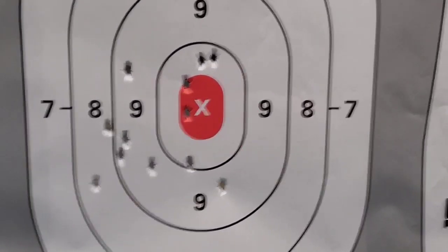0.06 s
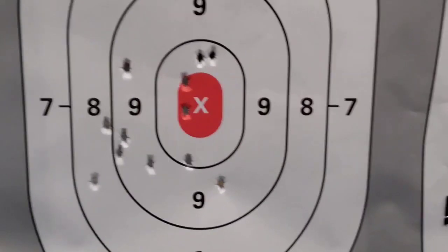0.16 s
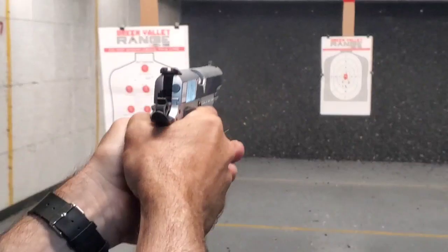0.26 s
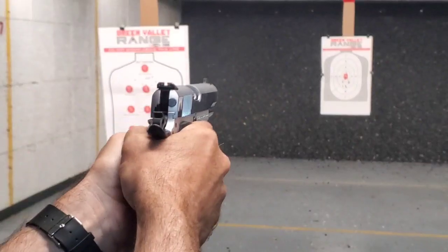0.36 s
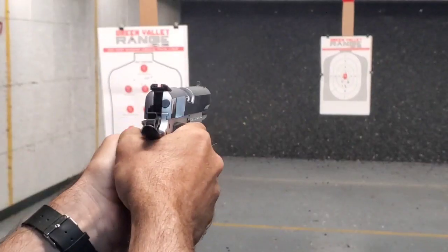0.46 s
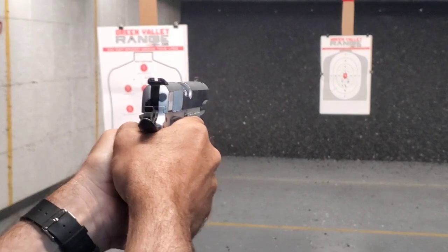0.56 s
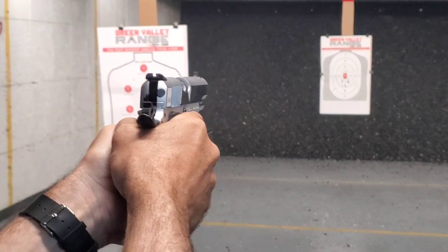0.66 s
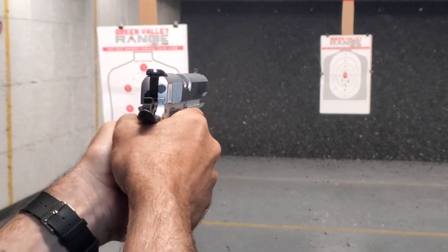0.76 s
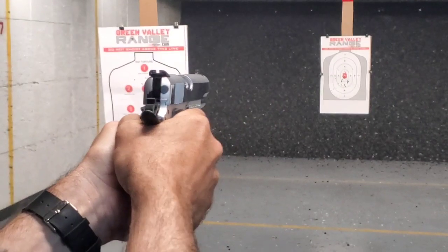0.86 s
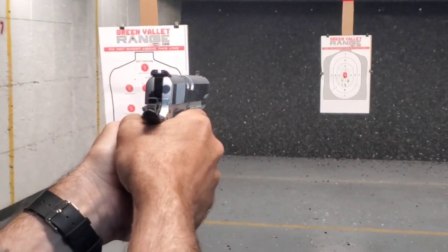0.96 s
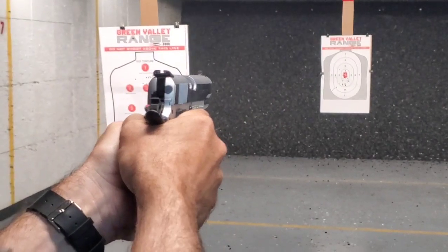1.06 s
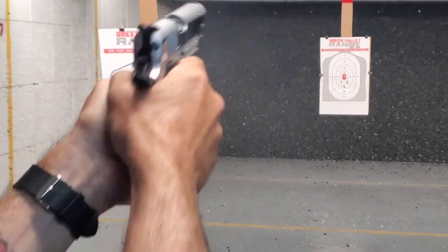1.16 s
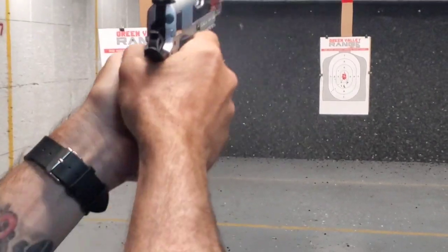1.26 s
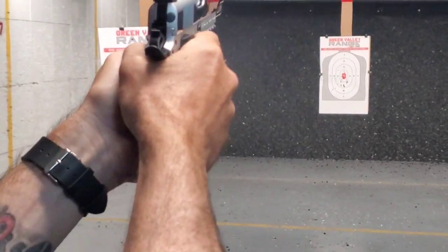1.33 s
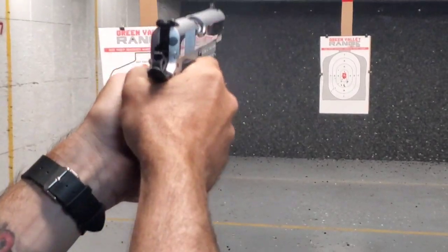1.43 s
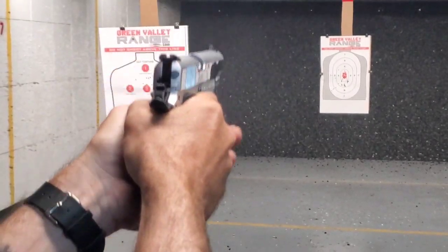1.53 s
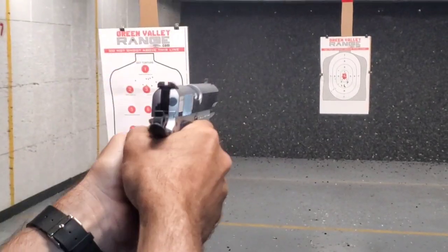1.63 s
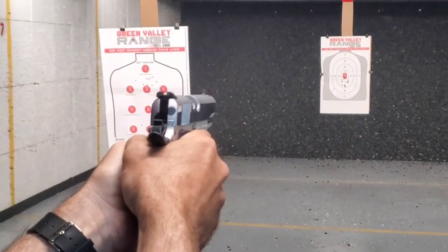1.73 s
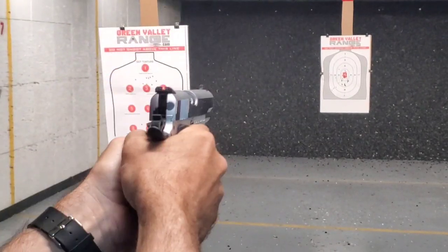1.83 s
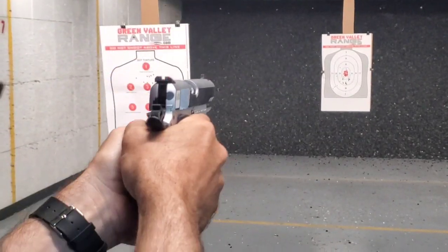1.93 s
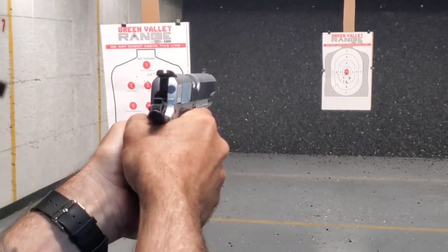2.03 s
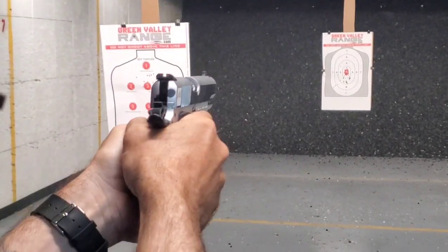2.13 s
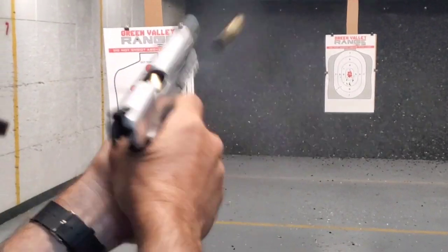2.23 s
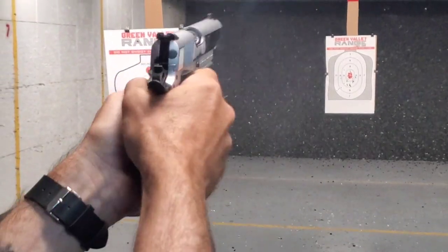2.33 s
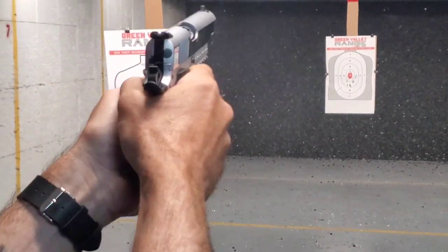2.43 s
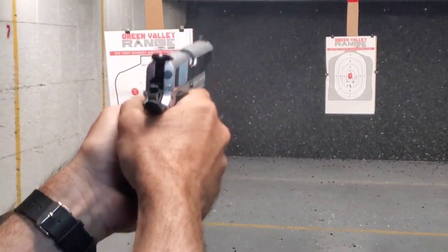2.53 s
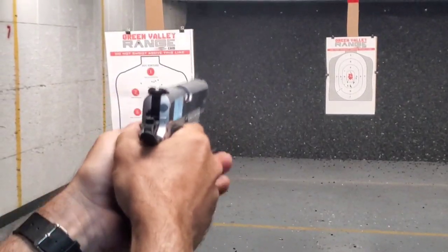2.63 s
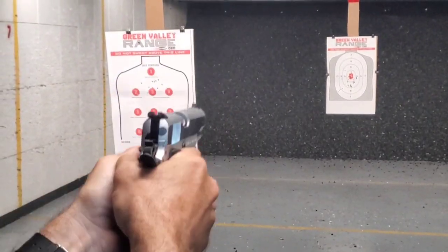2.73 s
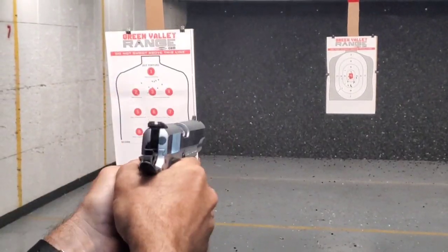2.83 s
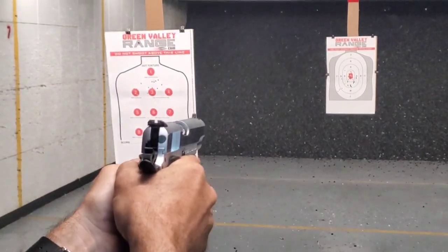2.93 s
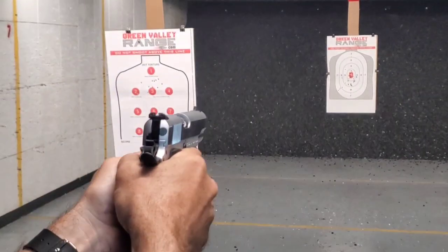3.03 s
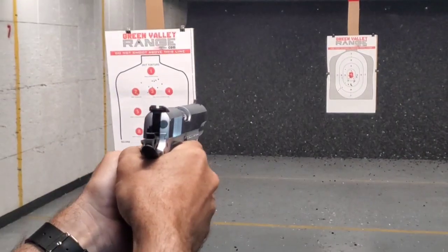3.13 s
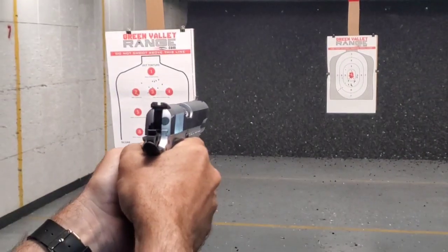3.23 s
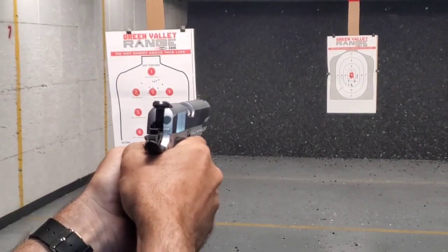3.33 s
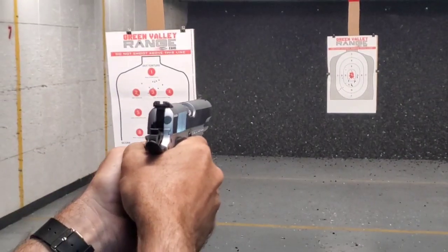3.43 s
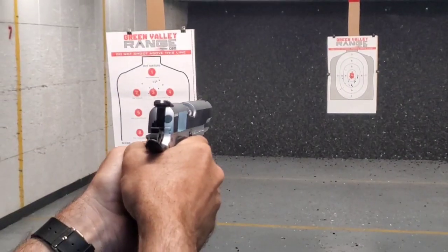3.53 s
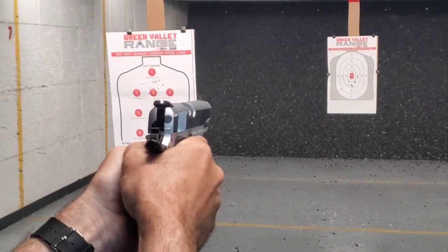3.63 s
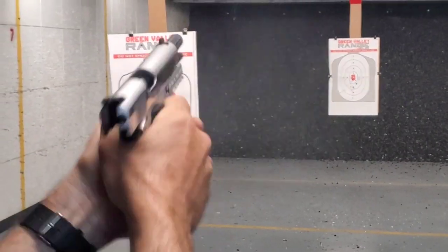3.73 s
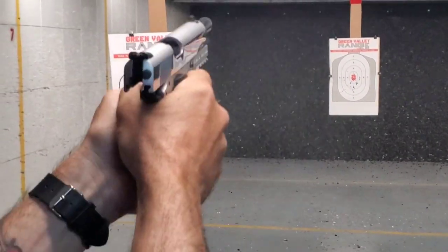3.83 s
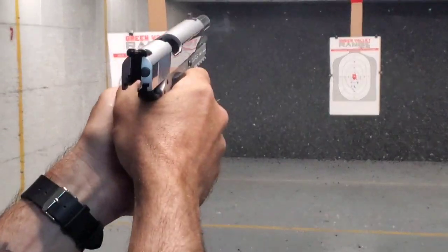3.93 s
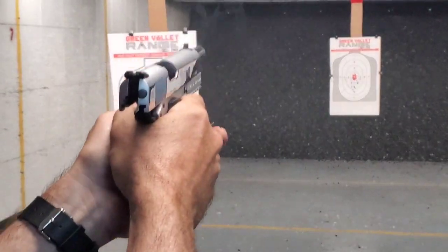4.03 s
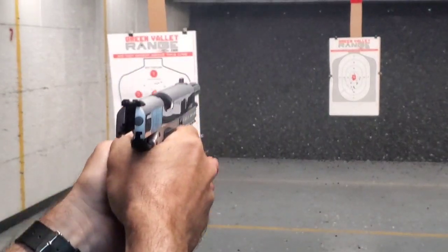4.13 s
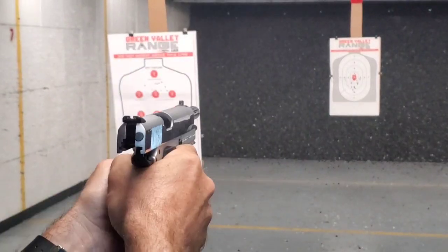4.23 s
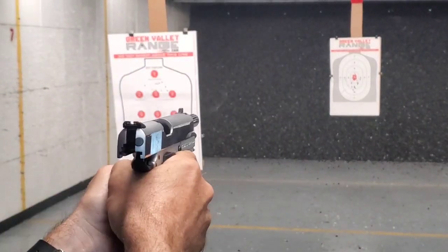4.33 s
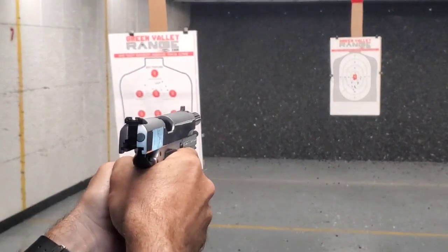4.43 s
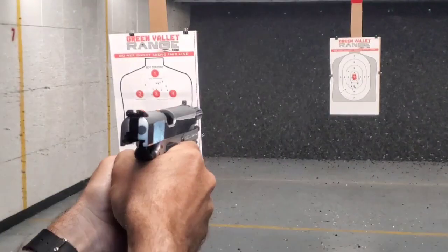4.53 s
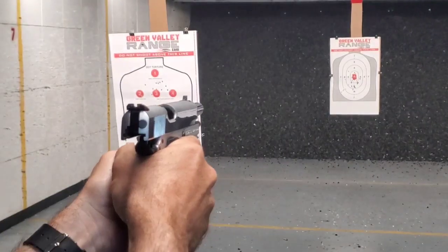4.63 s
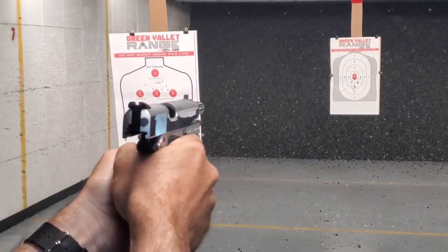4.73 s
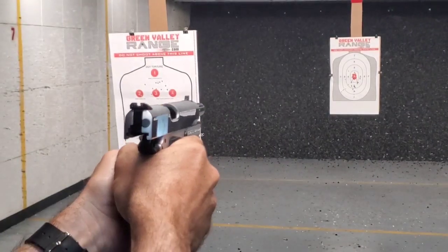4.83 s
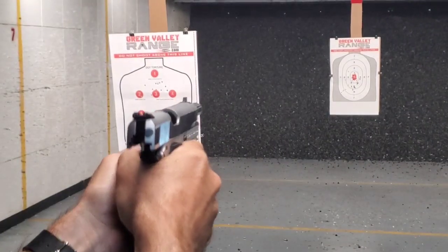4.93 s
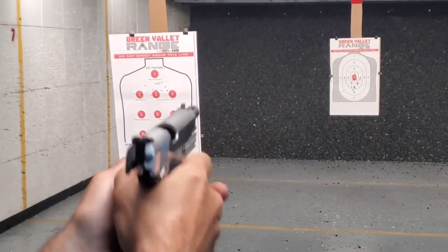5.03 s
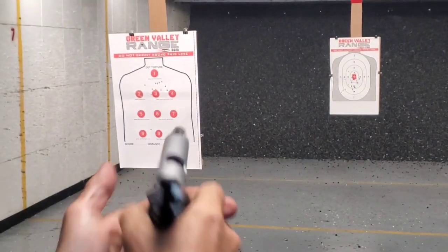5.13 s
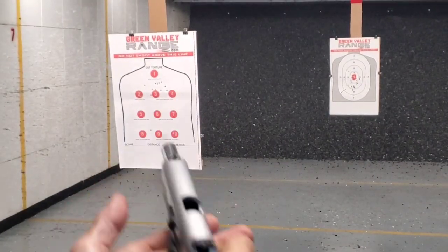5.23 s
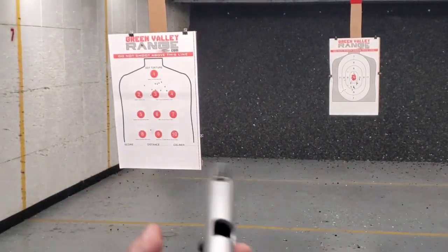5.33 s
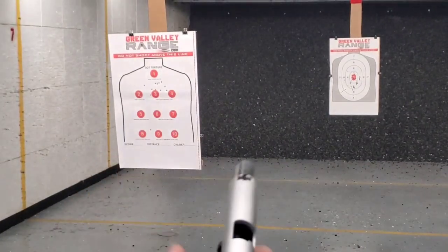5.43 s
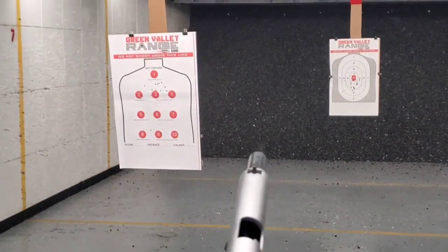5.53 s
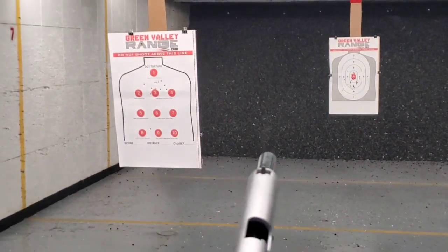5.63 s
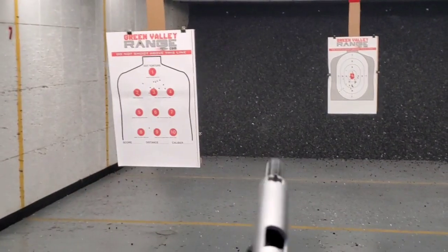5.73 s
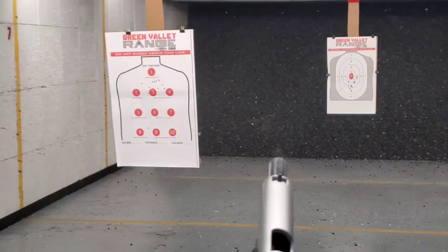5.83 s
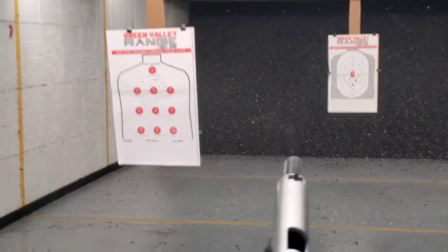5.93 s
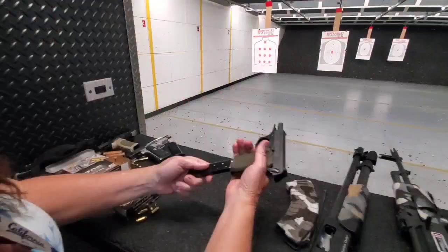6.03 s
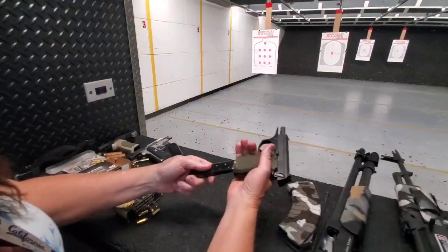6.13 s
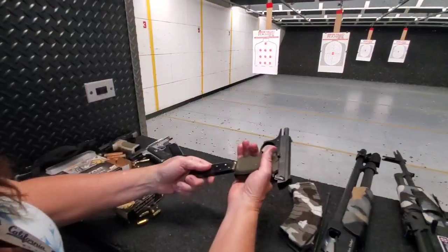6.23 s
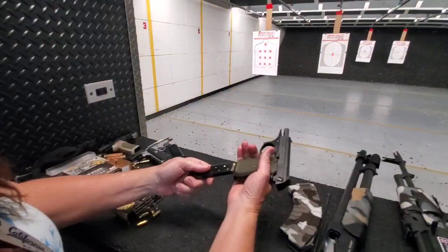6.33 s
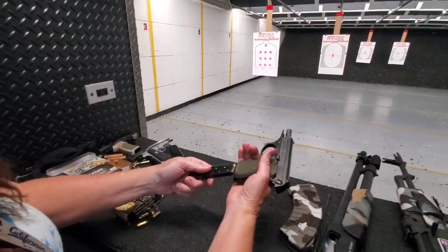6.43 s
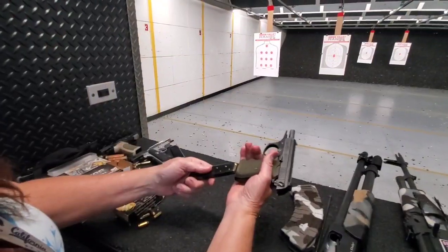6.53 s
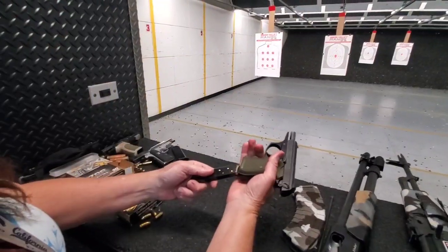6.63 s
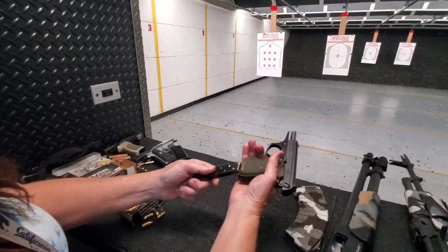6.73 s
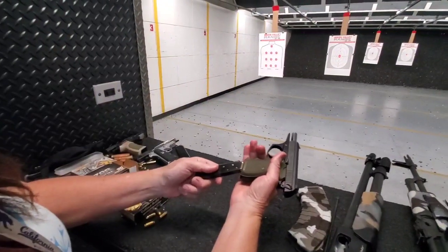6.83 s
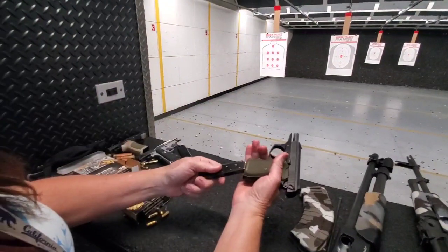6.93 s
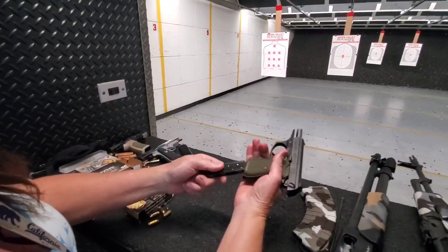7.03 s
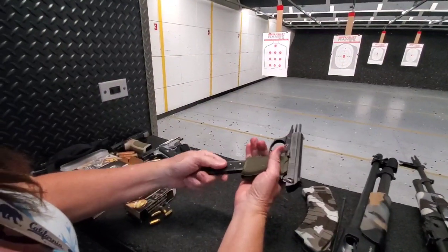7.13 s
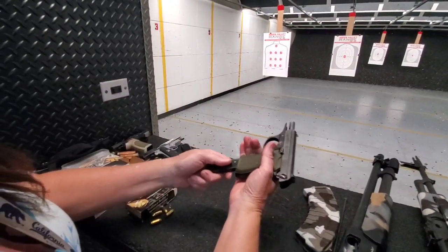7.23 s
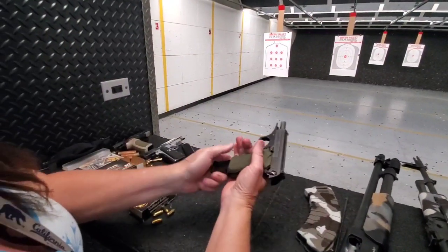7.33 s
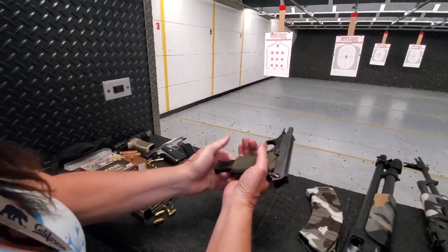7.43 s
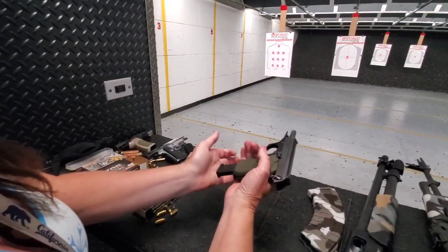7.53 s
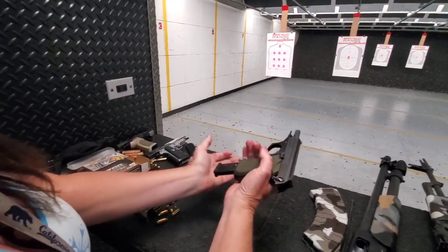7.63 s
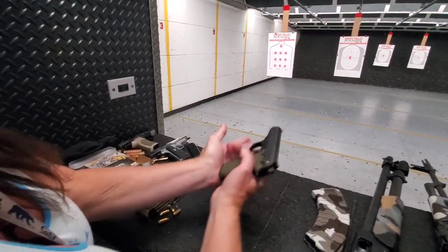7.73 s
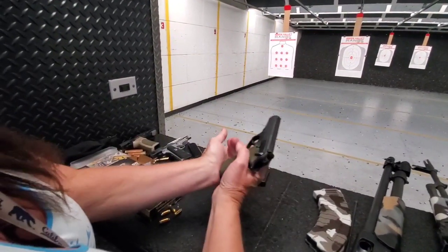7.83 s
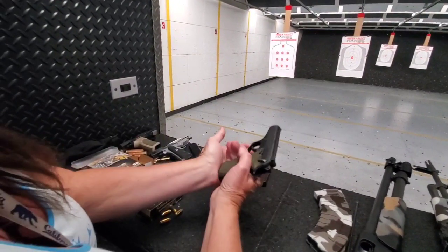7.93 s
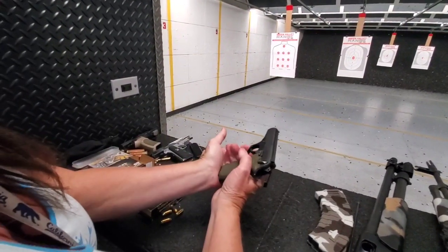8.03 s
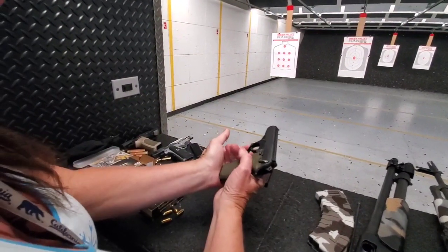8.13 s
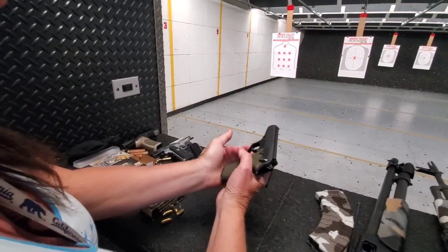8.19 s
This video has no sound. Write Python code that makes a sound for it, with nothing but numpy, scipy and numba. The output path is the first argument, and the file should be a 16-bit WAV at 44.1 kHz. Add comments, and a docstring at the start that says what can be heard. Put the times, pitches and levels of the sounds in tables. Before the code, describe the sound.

A low beating hum and faint air fade for 0.24 s, then a brief silence. At 0.34 s a somewhat duller pistol shot bursts out, followed by a brighter one at 1.24, a close pair at 2.17 and 2.36, and another pair at 3.82 and 4.1. Each is a hard crack with dense concrete echo and a low boom lasting over a second, loud enough to be limited. Between them brass cases click and ring high, strongest near 2.68, 3.05 and 4.48, some to the left. From about 5.6 ventilation rush, rumble and whine swell, cutting at 6.09 for an instant. A leftover boom and quiet air follow, with light handling scrapes at 6.27 and 6.5. Shots hit at 6.73 and 7.0. Scrapes at 7.66 lead to a rapid cluster of sharp magazine snaps around 7.9, then the echo and fan noise fade.

```python
"""Pistol shots in two lanes of a concrete indoor range: each is a shock pulse, an echo of decaying noise
and the hall's booming low air modes, all driving a limiter. Brass cases bounce as noise clicks with
short and ringing modes; hands, gear and a magazine scrape and snap as shaped noise. Ventilation is
filtered noise with fan tones and a whine, and it swells before the second of two brief silent gaps."""
import sys
import numpy as np
from scipy import signal
from scipy.fft import rfft, irfft, next_fast_len
from scipy.io import wavfile
from scipy.ndimage import uniform_filter1d, map_coordinates
from numba import njit

SR = 44100
rng = np.random.default_rng(int(sys.argv[2]) if len(sys.argv) > 2 else 0)


def to_wav(sig):
    """Store sig (one row per channel, or 1-D mono) as 16-bit WAV at the path in sys.argv[1].

    Samples outside -1..1 are clipped; the rate is SR.
    """
    pcm = np.clip(np.atleast_2d(sig), -1, 1) * 32767
    pcm = np.round(pcm).astype(np.int16)
    wavfile.write(sys.argv[1], SR, pcm.T)  # frames by channels


N = 364266

# pistol shots: start_s, blast_db, boom_db, treble_db
SHOTS = [(0.3351, 10.5, -24, -9), (1.235, 12.5, -20.5, 1.5), (2.1672, 14.5, -25.5, -3),
         (2.358, 12.5, -20.5, 2), (3.8176, 12.9, -20.5, 0.5), (4.095, 15, -26.5, -2.5),
         (6.734, 13, -26.5, -1.5), (6.995, 12, -27, -3.5)]
# silent gaps: start_s, end_s
GAPS = [(0.238, .33), (6.085, 6.099)]


def amp(db):
    """Amplitude factor of a level in dB."""
    return 10 ** (np.asarray(db) / 20)


def unit(x):
    """Scale to an RMS of 1."""
    return x / np.sqrt(np.mean(x ** 2) + 1e-20)


def along(points, hz):
    """Interpolate (Hz, value) points on a log frequency axis."""
    f, v = np.transpose(points)
    return np.interp(np.log(hz + 1), np.log(f + 1), v)


def add(track, sound, start_s):
    """Mix in a stereo sound, cut off at the end of the next gap."""
    i = round(start_s * SR)
    cuts = [round(end_s * SR) - i for _, end_s in GAPS if end_s > start_s]
    n = min([sound.shape[1], N - i] + cuts)
    track[:, i:i + n] += sound[:, :n]


def sides(pan_db):
    """Left and right gains whose ratio is pan_db; positive leans left."""
    return amp([[pan_db / 2], [-pan_db / 2]])


def field(size, spectrum_db, t60_s=None, patchy_db=0):
    """Stereo noise of a given spectrum, each frequency dying at its own speed, in patches of uneven strength."""
    # left-right correlation: freq_hz, correlation
    likeness = [(60, 1), (200, .8), (500, 0.61), (1000, 0.16), (3000, 0.0038), (15000, 0.073)]
    hz, t, z = signal.stft(rng.standard_normal((2, size)), SR, nperseg=512)
    turn = np.arccos(np.clip(along(likeness, hz), -1, 1))[:, None] / 2
    mid, side = np.cos(turn) * z[0], np.sin(turn) * z[1]
    z = np.array([mid + side, mid - side])
    patches = rng.standard_normal(z.shape[1:])
    patches = uniform_filter1d(patches, size=6, axis=0)
    patches = uniform_filter1d(patches, size=5, axis=1)
    gain = amp(spectrum_db(hz)[:, None] + patchy_db * unit(patches))
    if t60_s:
        gain = gain * amp(-60 * t / t60_s(hz)[:, None])
    return signal.istft(z * gain, SR, nperseg=512)[1][:, :size]


def ventilation():
    """Air rush over unsteady fan tones and a rumble, with a whine; all swell once, and shots shake the rumble."""
    # air rush spectrum: freq_hz, density_db_per_hz
    rush_spectrum = [(15, -39.5), (25, -20), (41, -11.5), (97, -3.5), (117, -17), (157, 0.5), (180, -18),
                     (317, -9), (1230, -27), (3820, -37), (4490, -41), (7710, -43.5), (16000, -56.5)]
    # fan tones: freq_hz, level_db against the rush
    fan_tones = [(151, -14.5), (231, -8.5), (318, -14), (441, -13), (528, -15)]
    # rumble spectrum: freq_hz, density_db_per_hz
    rumble_spectrum = [(10, -29), (25, 1), (45, 1.5), (70, -24.5), (200, -88.5)]
    air_db, whine_db, rumble_db = -58, -76.5, -66  # steady levels
    air_swell_db, whine_swell_db, rumble_swell_db = 22, 35.5, 19  # swell peaks against steady
    swell_end_s, swell_rise_s = 6.09, .44
    shake_db, shake_rise_s, shake_t60_s = -50, .12, 1.5
    whine_hz = 663
    t = np.arange(N) / SR

    def swell(peak_db):
        return 1 + amp(peak_db * (1 - abs(swell_end_s - t) / swell_rise_s)) * (t < swell_end_s)

    def waver():
        return map_coordinates(rng.standard_normal(200), [t * 14])  # 14 random points per second

    rush = unit(field(N, lambda hz: along(rush_spectrum, hz)))
    hum = 0
    for hz, db in fan_tones:
        hum = hum + amp(db + 4.3 * waver()) * np.sin(2 * np.pi * hz * t + 0.5 * waver())
    air = amp(air_db) * swell(air_swell_db) * (rush + hum)

    whine = np.sin(2 * np.pi * whine_hz * t + .6 * waver())
    whine = amp(whine_db) * swell(whine_swell_db) * whine

    noise = signal.resample(rng.standard_normal((2, N // 50)), N, axis=1)  # low frequencies only
    deep = irfft(rfft(noise) * amp(along(rumble_spectrum, np.fft.rfftfreq(N, 1 / SR))), N)
    shake = 0
    for start_s, *_ in SHOTS:
        since_s = np.maximum(t - start_s, 0)
        shake = shake + amp(shake_db - 60 * since_s / shake_t60_s) * (1 - np.exp(-since_s / shake_rise_s))
    rumble_level = amp(rumble_db) * swell(rumble_swell_db) + shake
    rumble = rumble_level * unit(deep + deep[::-1] * 0.4)  # each side leaks into the other
    return air + whine + rumble


def opening_tones():
    """Two low tones beat and decay until the first gap ends."""
    # tones: freq_hz, level_db, t60_s
    low_tones = [(73.6, -37, 1.9), (98, -35, 1.4)]
    out, t = np.zeros((2, N)), np.arange(2 * SR) / SR
    tones = sum(amp(db - 60 * t / t60_s) * np.sin(2 * np.pi * hz * t) for hz, db, t60_s in low_tones)
    add(out, tones[None], 0)
    return out


def tilt(hz, bass_db, treble_db):
    """The contact spectrum with a low and a high shelf."""
    # contact spectrum: freq_hz, density_db_per_hz
    contact_spectrum = [(300, -7.5), (1000, -3.5), (3500, 4.5), (5500, 2), (8500, -4), (13000, 4.5),
                        (16000, 1.5)]
    bass = bass_db / (1 + (hz / 3200) ** 4)
    treble = treble_db / (1 + (9500 / (hz + 1)) ** 6)
    return along(contact_spectrum, hz) + bass + treble


def click(colour, scrape_s, near_t60_s, far_db, far_t60_s, wall_db, wall_s=0.19):
    """A contact: a snap and a burst dying in the booth, a fainter answer of the hall and the far wall's slap."""
    snap_db, snap_t60_s = 4.5, 0.008
    t = np.arange(SR // 2) / SR
    since_s = np.maximum(t - scrape_s, 0)
    near = amp(-60 * since_s / near_t60_s)
    far = amp(far_db - 60 * since_s / far_t60_s)
    snap = amp(snap_db - 60 * t / snap_t60_s)
    back_s = np.maximum(t - wall_s, 0)
    slap = amp(wall_db - 60 * back_s / far_t60_s) * (1 - np.exp(-back_s / .015))
    shape = near + far + snap + slap
    return field(len(t), colour, patchy_db=1.5) * shape * (1 - np.exp(-t / 0.0014))


def handling():
    """Hands, gear and magazine scrape and snap, each with its own resonance; more bass means less treble."""
    # contacts: start_s, level_db, left_right_db, bass_db, scrape_s, t60_s, body_hz
    contacts = [(0.079, -75, 1, 23, 0.049, 0.5, 3000), (3.642, -67, -1, 28, 0.018, 0.12, 790),
                (3.712, -55.5, 0, 4.5, 0.11, .1, 2000), (6.0337, -46, -9.5, 11.5, 0.0018, 0.02, 2470),
                (6.105, -69, 1.5, 10.5, 0.043, 0.23, 3000), (6.269, -55, 1, 11.5, 0.044, 0.39, 850),
                (6.49, -53, 4, 3, 0.0041, 0.06, 1500), (7.657, -52, 3, -5, 0.042, 0.27, 4000),
                (7.777, -52, 1, 0.5, 0.052, 0.2, 3110), (7.87, -34.5, 2, -4.5, 0.0047, 0.134, 2970),
                (7.888, -20.5, 3.5, -9, 0.0033, 0.058, 3000), (7.903, -26.5, 16.5, -8.5, .003, 0.043, 3000),
                (7.911, -11.5, 1.5, -7, 0.0052, 0.039, 2050), (7.927, -37.5, 1.5, -7.5, 0.0073, 0.41, 2050)]
    base_treble_db, treble_per_bass, body_db = -5.5, -0.39, 8.5
    out = np.zeros((2, N))
    for start_s, db, pan_db, bass_db, scrape_s, t60_s, body_hz in contacts:
        treble_db = base_treble_db + treble_per_bass * bass_db

        def colour(hz):
            body = body_db / (1 + ((hz - body_hz) / (0.091 * body_hz)) ** 2)
            return tilt(hz, bass_db, treble_db) + body

        sound = click(colour, scrape_s, t60_s, far_db=-19, far_t60_s=0.2, wall_db=-39.0)
        add(out, amp(db) * sides(pan_db) * sound, start_s)
    return out


def boom(t, rise_s=0.078, apart_s=0.00013):
    """The hall's air modes build up as the wave crosses it, then ring out, slightly offset between channels."""
    # low air modes of the hall: freq_hz, level_db, t60_s
    air_modes = [(55.5, -11.5, 2.4), (79.1, -19, 2.6), (91.18, 2.5, 2.18), (98.4, -22.5, 3.7),
                 (120.4, -0.5, 1), (168, -16.5, 0.43), (211.3, -8.5, 1.2), (257, -13, 0.41), (326, -5, .4),
                 (476, -8, 0.97), (501, -10, 0.85), (578, -7.5, 0.45), (690, -6.5, 0.45), (820, -4.5, 0.36)]
    ports_s = t + np.array([[-apart_s], [apart_s]])
    ring = sum(amp(db - 60 * t / t60_s) * np.sin(2 * np.pi * hz * ports_s) for hz, db, t60_s in air_modes)
    return ring * (1 - np.exp(-(t / rise_s) ** 2))


def shots():
    """A shock pulse, the hall's dense echo in a quick and a slow part, and the boom; one boom tail stands alone."""
    # quick echo spectrum: freq_hz, density_db_per_hz
    blast_spectrum = [(35, -43), (60, -13), (217, -9), (287, -10.5), (398, -4.5), (842, -3), (1820, -11),
                      (2650, -13), (6740, -18), (7400, -22.5), (13000, -17), (14900, -16.5), (16000, -29.5)]
    # quick echo decay: freq_hz, t60_s
    hall_decay = [(40, 0.45), (120, 0.71), (300, 0.56), (700, 0.52), (2000, 0.63), (5000, 0.42),
                  (9000, 0.32), (15000, 0.27)]
    # slow echo: freq_hz, density_db_per_hz, t60_s
    slow_echo = [(150, -45, 0.88), (600, -41, 1.8), (2480, -35.5, 1.11), (6000, -43.5, .8),
                 (15000, -51.5, 0.27)]
    # boom tails without a blast: start_s, shot_age_s, boom_db
    boom_tails = [(6.099, 1.1, -14)]
    bass_per_treble = .55  # nearer shots are both brighter and fuller
    out, t = np.zeros((2, N)), np.arange(2 * SR) / SR
    u = t[:SR // 20] / 0.00016
    shock = 0.077 * (1 - u) * np.exp(-u)
    late_hz, late_db, late_t60_s = np.transpose(slow_echo)
    late_spectrum = np.column_stack((late_hz, late_db))
    late_decay = np.column_stack((late_hz, late_t60_s))
    for start_s, db, boom_db, treble_db in SHOTS:
        bass_db = bass_per_treble * treble_db

        def colour(hz):
            treble = treble_db / (1 + (6000 / (hz + 1)) ** 2)
            bass = bass_db / (1 + (hz / 260) ** 4)
            return along(blast_spectrum, hz) + treble + bass

        quick = field(len(t), colour, lambda hz: along(hall_decay, hz), patchy_db=1.5)
        slow = field(len(t), lambda hz: along(late_spectrum, hz),
                     lambda hz: along(late_decay, hz), patchy_db=2.5)
        blast = (quick + slow) * (1 - np.exp(-t / 0.0045))
        blast[:, :len(u)] += shock
        add(out, amp(db) * blast + amp(boom_db) * boom(t), start_s)
    for start_s, age_s, boom_db in boom_tails:
        add(out, amp(boom_db) * boom(t[:SR] + age_s), start_s)
    return out


def bounce(click_db, bass_db, treble_db, click_t60_s, modes):
    """A click on the concrete with short contact modes, and the brass tube's ring, wavering as it spins."""
    # short modes during floor contact: freq_hz, level_db against the click, t60_s
    contact_modes = [(2100, -2, .03), (3600, -9, .03), (5600, -3, .035), (13200, -5, .03)]
    settle_s = .15  # the wavering shrinks as the spin slows
    t = np.arange(SR // 2) / SR
    sound = amp(click_db) * click(lambda hz: tilt(hz, bass_db, treble_db), 0, click_t60_s,
                                  far_db=-12.5, far_t60_s=0.34, wall_db=-42.5)
    for hz, db, t60_s in contact_modes:
        level_chance, pitch_chance = rng.standard_normal(2)
        level_db = click_db + db + tilt(hz, bass_db, treble_db) + 2.5 * level_chance
        tone = np.sin(2 * np.pi * hz * (1 + .04 * pitch_chance) * t)
        sound = sound + amp(level_db - 60 * t / t60_s) * tone * (1 - np.exp(-t / .0011))
    for hz, db, t60_s, waver in modes:
        # two smooth random curves, 200 points per second
        where = [[[0], [1]] + 0 * t, 200 * t + [[0], [0]]]
        spin = map_coordinates(rng.standard_normal((2, 120)), where)
        spin = spin * (.3 + 0.81 * np.exp(-t / settle_s))
        # each channel's phase follows the other's level curve
        ring = amp(db - 60 * t / t60_s + 2.5 * spin) * np.sin(2 * np.pi * hz * t + waver * spin[::-1])
        sound = sound + np.sqrt(2) * ring * (1 - np.exp(-t / 0.0053))
    return sound


def far_cases():
    """Cases from the next lane, on the left, bounce and ring in one mode."""
    # bounces: start_s, click_db, left_right_db, treble_db, ring_hz, ring_db
    far_bounces = [(0.539, -36, 5.5, 0, 10700, -53), (1.088, -56, 13.5, 13, 11240, -43.5),
                   (1.831, -57, 5, 9, 11280, -46.5), (2.0186, -68, 14.5, 6, 11400, -61.5),
                   (2.144, -56, 6, -13, 11280, -59), (2.8, -75, 7, -5, 11280, -68),
                   (3.1394, -51, 6.5, -8, 11280, -53), (3.56, -74.5, 6, -5, 11280, -66),
                   (4.479, -31.5, 2, -2.5, 11520, -49), (4.8898, -52.5, 12.5, 17, 11550, -43.5),
                   (5.5163, -54, 9, 6, 11550, -44.5), (5.903, -46.5, 3, -4, 11540, -37),
                   (5.9216, -51, 8, 9, 11550, -31.5)]
    bass_db, click_t60_s, ring_t60_s, waver = -10, 0.092, 0.29, 1.5
    out = np.zeros((2, N))
    for start_s, db, pan_db, treble_db, hz, ring_db in far_bounces:
        modes = [(hz, ring_db, ring_t60_s, waver)]
        add(out, sides(pan_db) * bounce(db, bass_db, treble_db, click_t60_s, modes), start_s)
    return out


def near_cases():
    """The shooter's cases bounce and ring in three modes, leaning to high or low modes by bounce."""
    # bounces: start_s, click_db, bass_db, treble_db, ring_db, lean_db_per_octave to the high modes
    near_bounces = [(1.0398, -44, -11, 5.5, -57, 1), (1.5194, -50.5, 8, -4, -77, -8),
                    (1.607, -60, -5, 8, -63, 19), (1.6252, -48.5, 15, -10, -57.5, 8),
                    (1.6791, -62, 8, 10, -59, 5.5), (1.775, -48.5, 3, -24, -74, -6),
                    (1.9086, -70.5, 6.5, -2, -74, 6), (2.6764, -20.5, -13, -4, -54.5, -14),
                    (2.7894, -64, 6, -7, -74, -2), (2.9, -40.5, -36, -7, -85, -8),
                    (3.052, -23.5, -12.5, -6.5, -51, -5), (3.3192, -47.5, -1, -3, -64, -1),
                    (3.4481, -64, 10.5, 7, -66, 11), (3.543, -44, 14, -4, -60, 10.5),
                    (3.6708, -40, -4, -5.5, -64, 6), (3.7882, -34, -5.5, -5, -52.5, 7.5),
                    (4.8527, -45.5, -16, -5.5, -64, -18), (5.105, -50.5, -9, -3.5, -70, -18),
                    (5.2648, -53.5, -17.5, -17, -70, -12), (5.361, -53, -2, 0, -68.5, 2),
                    (5.4937, -61, -5, 0, -57.5, 7), (5.8585, -57, -3, -2, -85, -10.5)]
    # ring modes: freq_hz, level_db against the ring, t60_s, waver (phase factor)
    brass_modes = [(4440, 0, 0.17, 2.8), (7880, 2, 0.65, 1.2), (12200, -4, .5, 1.1)]
    pan_db, click_t60_s = 0.5, .065
    pivot_hz = brass_modes[1][0]
    out = np.zeros((2, N))
    for start_s, db, bass_db, treble_db, ring_db, lean_db in near_bounces:
        modes = []
        for hz, mode_db, t60_s, waver in brass_modes:
            level_db = ring_db + mode_db + lean_db * np.log2(hz / pivot_hz)
            modes.append((hz, level_db, t60_s, waver))
        add(out, sides(pan_db) * bounce(db, bass_db, treble_db, click_t60_s, modes), start_s)
    return out


def scene():
    """Sum of all sources, stereo."""
    return ventilation() + opening_tones() + handling() + shots() + far_cases() + near_cases()


@njit
def follow(peak, fall):
    """Jumps to each peak and sinks back slowly."""
    out, level = np.empty_like(peak), 0.0
    for i in range(len(peak)):
        level = max(peak[i], level * fall)
        out[i] = level
    return out


def record(dry, limit_db=-3, release_s=0.014):
    """Limiter on both channels together, soft clipping, the gaps, the unlike channels and the band limit."""
    # channel balance: freq_hz, left_right_db
    balance = [(100, -1), (700, -0.5), (2500, -1.5), (6000, 1.5), (13000, 3.5)]
    low_cut_hz, top_hz = 34, 16000
    level = follow(np.abs(dry).max(axis=0), np.exp(-1 / (release_s * SR)))
    gain = uniform_filter1d(np.minimum(1, amp(limit_db) / (level + 1e-9)), size=45)
    x = dry * gain
    x = x / (1 + np.abs(x / .98) ** 6) ** (1 / 6)  # soft clip
    t = np.arange(N) / SR
    for start_s, end_s in GAPS:
        x = x * np.clip(np.maximum((start_s - t) / 0.0009, (t - end_s) / .004), 0, 1)
    m = next_fast_len(N + 8192)
    hz = np.fft.rfftfreq(m, 1 / SR)
    band = hz ** 4 / (hz ** 4 + low_cut_hz ** 4) * np.exp(-(hz / top_hz) ** 40)
    channels = amp(along(balance, hz) / [[2], [-2]])
    return irfft(rfft(x, m) * band * channels, m)[:, :N]


dry = scene()
out = record(dry)
to_wav(out)
```